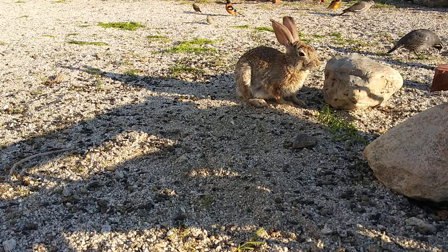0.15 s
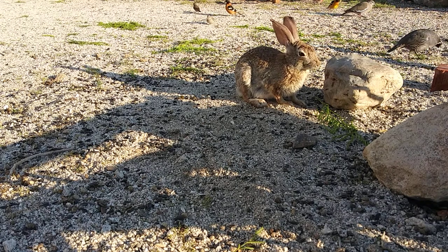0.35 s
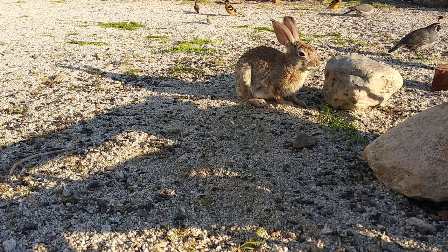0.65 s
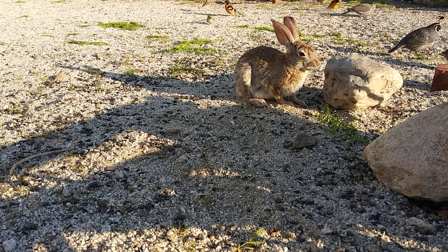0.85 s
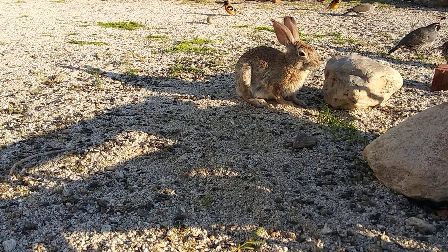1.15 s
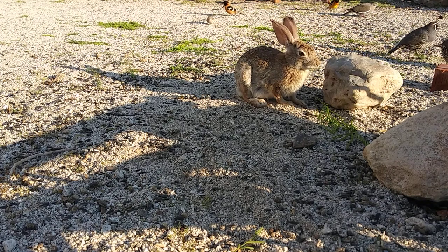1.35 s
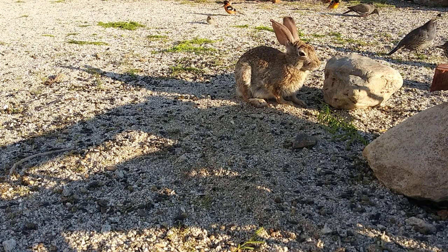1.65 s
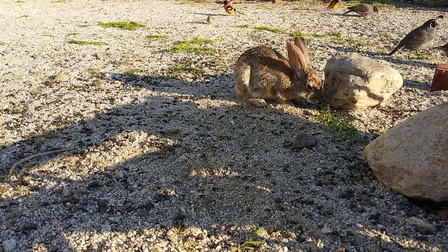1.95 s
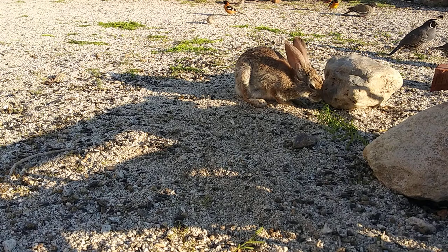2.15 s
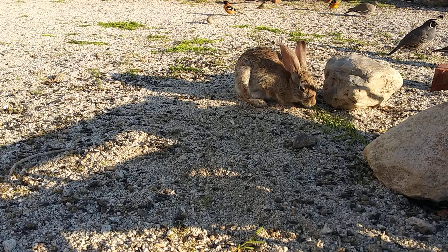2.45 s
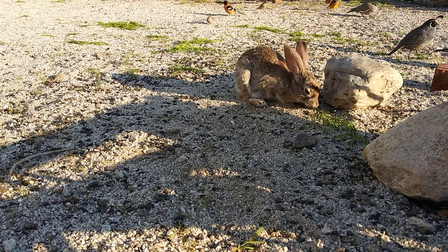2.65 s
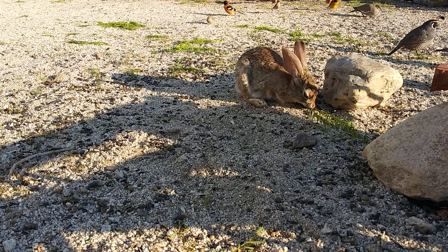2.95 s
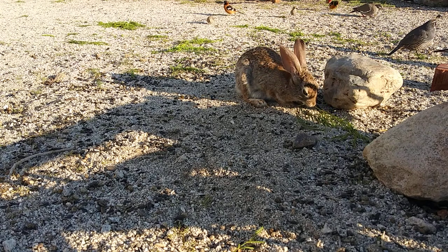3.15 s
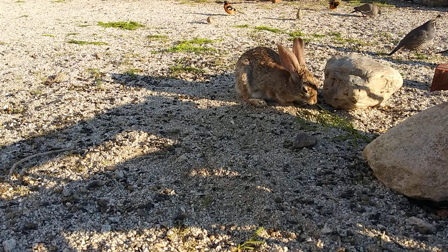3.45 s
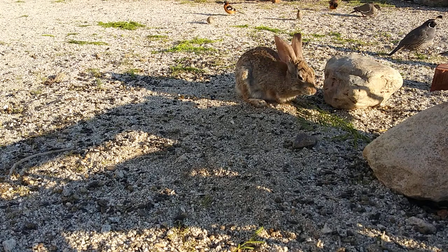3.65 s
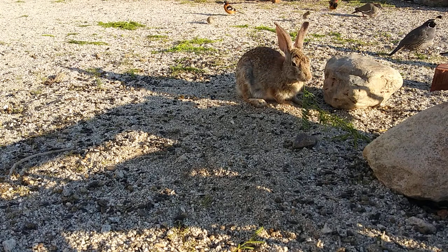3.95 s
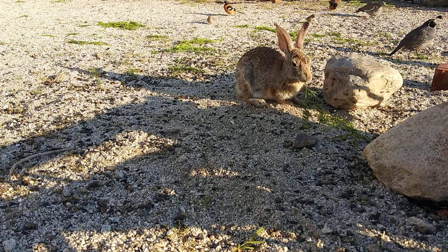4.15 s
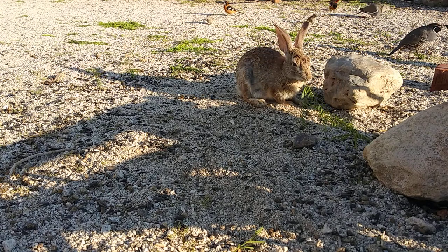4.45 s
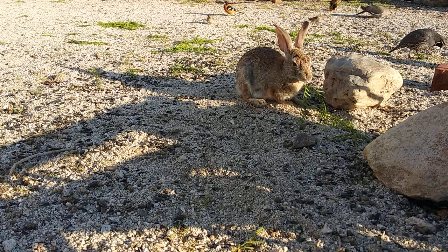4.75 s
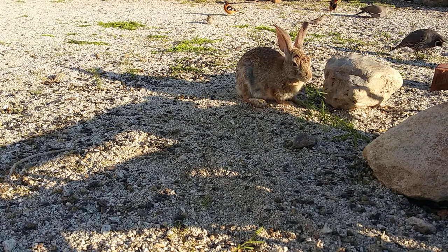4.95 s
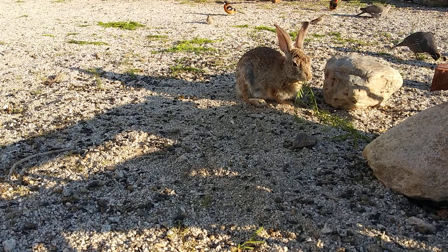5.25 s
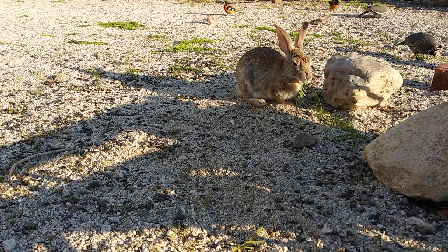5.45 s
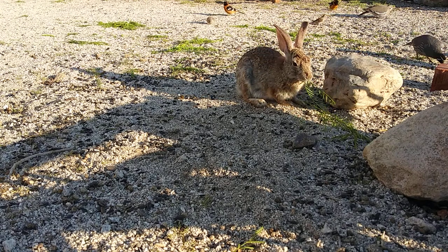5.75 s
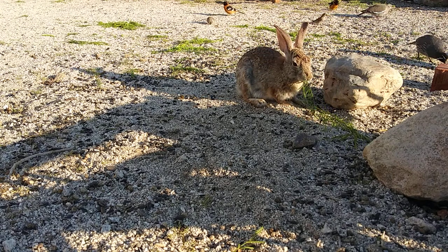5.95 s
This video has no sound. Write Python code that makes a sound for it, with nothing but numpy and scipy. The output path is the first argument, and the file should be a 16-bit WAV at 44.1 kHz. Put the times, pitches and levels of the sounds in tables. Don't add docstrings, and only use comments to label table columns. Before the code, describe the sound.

Outdoor gravel yard with a faint distant hum and hiss. At first a quail gives four raspy arched calls while wind puffs bump the microphone. Small birds chirp and flutter, seeds crack in beaks, one very loud near the middle. Later a clearer quail whistles two rounded calls, each doubled by a wall echo, among faint far quail, and a softer answer ends it.

```python
import sys
import numpy as np
from scipy import signal
from scipy.fft import rfft, irfft
from scipy.io import wavfile
from scipy.ndimage import uniform_filter1d, map_coordinates

SR = 44100
rng = np.random.default_rng(int(sys.argv[2]) if len(sys.argv) > 2 else 0)


def unload_audio(sound):
    columns = np.transpose(np.atleast_2d(sound))
    steps = np.round(np.clip(columns, -1, 1) * 32767)
    wavfile.write(sys.argv[1], SR, steps.astype(np.int16))


def nominal_scale(level):
    x = np.asarray(level, float) / 20
    return 10 ** x


N = 269002


def track(rows, order, smooth_s=0.0092):
    s, *columns = np.transpose(rows)
    place = np.interp(np.arange(s[0], s[-1], 1 / SR), s, np.arange(len(s)))
    curves = []
    for column in columns:
        curve = map_coordinates(column, [place], order=order, mode="nearest")
        curves.append(uniform_filter1d(curve, int(smooth_s * SR) + 1))
    return s[0], curves


def read(points, hz):
    f, value = np.transpose(points)
    return np.interp(np.log(hz + 1), np.log(f + 1), value)


def evened(x):
    return x / np.sqrt(np.mean(x ** 2) + 1e-20)


def add(mix, s, sound):
    part = mix[round(s * SR):][:len(sound)]
    part += sound[:len(part)]


def resonate(x, hz, width):
    return signal.lfilter(*signal.iirpeak(min(hz, SR / 2.2), hz / width, SR), x)


def resonate_twice(x, hz, width):
    return resonate(resonate(x, hz, width), hz, width)


def coloured(points):
    gain = nominal_scale(read(points, np.fft.rfftfreq(N, 1 / SR)))
    return evened(irfft(rfft(rng.standard_normal(N)) * gain, N))


def voice(hz, level_db, rough, throat, breath_db=-34, steady=True, count=14):
    waver = evened(uniform_filter1d(rng.standard_normal(len(hz)), 60))
    turns = np.cumsum(hz) / SR + 0.14 * np.clip(rough, 0, 1) * waver
    k = np.arange(1, count + 1)[:, None]
    softer_db = 0.34 * (level_db - np.max(level_db)) * (k * hz > 4000)
    gains = nominal_scale(read(throat, k * hz) + softer_db) * (k * hz < SR / 2.5)
    loudness = np.sqrt((gains ** 2).sum(0) / 2) if steady else 1
    tone = (gains * np.cos(2 * np.pi * k * turns + k * k)).sum(0) / loudness
    air = rng.standard_normal(len(hz))
    breath = nominal_scale(breath_db) * (0.23 * air + 2 * resonate(air, 8450, 2500))
    fade = signal.windows.tukey(len(hz), min(0.0068 * SR / len(hz), 1))
    return nominal_scale(level_db) * (tone + breath) * fade


# pitch_hz [Hz], level_db [dB]
WASH_COLOUR = [(76, -41), (130, -6.5), (225, -3), (450, -6), (900, -13), (2050, -17), (4500, -19),
               (6400, -25), (7500, -19.5), (8600, -12.5), (10000, -20.5), (15500, -17.5), (16000, -50)]


def yard():
    swell, waver = (evened(uniform_filter1d(uniform_filter1d(rng.standard_normal(N), 4000), 4000))
                    for _ in range(2))
    hum_hz = 119 + 3 * waver
    hum = nominal_scale(1.6 * swell[::-1]) * np.cos(2 * np.pi * np.cumsum(hum_hz) / SR)
    wash = nominal_scale(-67 + 0.36 * swell) * coloured(WASH_COLOUR)
    return wash + nominal_scale(-74.5) * hum


# start_s [s], peak_db [dB], pitch_hz [Hz]
WIND_PUFFS = [(0.029, -66.5, 68), (0.059, -57, 148), (0.111, -60, 72), (0.189, -59, 115), (0.27, -41, 124),
              (0.308, -38.5, 105), (0.453, -48.5, 81.4), (0.478, -59, 64.6), (0.519, -70, 65),
              (0.71, -56, 113), (0.799, -57, 112), (0.862, -41.5, 93), (0.96, -55, 85)]
# start_s [s], level_db [dB]
WIND_STRENGTH = [(0.0, -59.5), (0.2, -81), (0.3, -65), (0.42, -74), (0.49, -62), (0.61, -81), (0.7, -63),
                 (0.76, -79), (0.88, -66), (1.09, -85), (1.15, -76), (1.44, -78), (1.51, -84), (1.65, -73),
                 (1.73, -88), (2.43, -94), (3.06, -84.5), (3.43, -90), (3.52, -80), (3.82, -91),
                 (5.98, -84), (6.1, -82)]


def wind():
    t = np.arange(N) / SR
    strength_db = np.interp(t, *np.transpose(WIND_STRENGTH))
    out = nominal_scale(strength_db) * coloured([(20, -61), (45, -2), (70, 7), (100, 5), (160, -18), (300, -47)])
    for s, db, hz in WIND_PUFFS:
        cycle = np.arange(2000) / SR * hz - 1
        add(out, s, nominal_scale(db) * np.exp(-(cycle / 0.5) ** 2) * np.cos(2 * np.pi * cycle))
    return out


# start_s [s], pitch_hz [Hz], level_db [dB]
FAR_QUAIL_CALLS = [
    [(1.95, 606, -81), (1.97, 532, -66), (1.998, 418, -74), (2.01, 390.5, -101)],
    [(3.5, 547, -66.5), (3.564, 683, -72), (3.592, 714, -68), (3.628, 730, -64), (3.67, 810, -80)],
    [(4.27, 538, -88), (4.288, 662, -70), (4.306, 736, -66.5), (4.34, 527.9, -78)],
    [(4.4, 461.2, -76), (4.48, 606, -78.5), (4.544, 747, -68.5), (4.598, 857.3, -70), (4.682, 984, -68.5),
     (4.712, 997, -64), (4.774, 913.3, -69.5), (4.82, 731.9, -79)],
    [(4.96, 488, -71), (4.984, 767, -69), (5.0, 934, -67), (5.062, 652, -66), (5.08, 596.6, -81)],
    [(5.22, 391, -80), (5.24, 436, -74), (5.248, 405, -57), (5.26, 380, -69)],
    [(5.41, 654, -77), (5.444, 955, -61.5), (5.47, 889, -54), (5.5, 463, -67)],
    [(5.53, 428, -73), (5.62, 636, -61.5), (5.676, 983, -62.5), (5.718, 1054, -63.5), (5.786, 1068, -68.5),
     (5.8, 1074, -93)],
    [(5.855, 506, -91), (5.863, 474, -51.5), (5.871, 452, -63), (5.89, 416, -58)],
    [(5.98, 515, -68), (6.004, 810, -70), (6.02, 1045, -61), (6.032, 979.5, -74), (6.1, 625, -62)],
]
# pitch_hz [Hz], level_db [dB]
FAR_QUAIL_THROAT = [(400, 10.5), (1000, -8), (1700, -18), (2000, -10.5), (2300, -19), (2900, -17),
                    (3400, -21), (5000, -42)]


def far_quail():
    out = np.zeros(N)
    for rows in FAR_QUAIL_CALLS:
        s, (hz, level_db) = track(rows, order=1, smooth_s=.005)
        add(out, s, voice(hz, level_db, .04, FAR_QUAIL_THROAT))
    return out


# start_s [s], pitch_hz [Hz], level_db [dB]
BIRD_CHIRP = [(1.545, 3726, -69), (1.57, 4214, -54.5), (1.582, 3880, -54.5), (1.59, 3120, -64),
              (1.6, 2900, -54.5), (1.607, 3036, -62), (1.617, 3790, -63), (1.635, 3350, -57.5),
              (1.655, 3300, -81)]
# start_s [s], pitch_hz [Hz], level_db [dB]
BIRD_WHISTLES = [
    [(2.05, 2832, -87), (2.086, 3470, -86), (2.1, 3538, -82), (2.126, 3429, -78), (2.184, 3052, -81),
     (2.216, 2918, -81), (2.316, 2780, -85), (2.38, 2790, -86), (2.45, 3052, -89)],
    [(2.5, 3370, -72), (2.53, 3580, -65), (2.554, 1826, -69), (2.58, 2790, -69.5), (2.6, 2660, -85)],
]
# start_s [s], pitch_hz [Hz], level_db [dB]
PURE_WHISTLES = [
    [(1.9, 8100, -89), (2.05, 8250, -84), (2.1, 8800, -83), (2.25, 8500, -89), (2.35, 8600, -81),
     (2.5, 8800, -88)],
    [(5.89, 4150, -76), (5.93, 4160, -68), (6, 4060, -80), (6.05, 4120, -70.5), (6.1, 4130, -65)],
    [(5.56, 3900, -71), (5.6, 4200, -71), (5.65, 3950, -69), (5.72, 3800, -70)],
    [(5.67, 5050, -78), (5.72, 5250, -75), (5.8, 5350, -73)],
]
# pitch_hz [Hz], level_db [dB]
CHIRP_BILL = [(3000, 0), (4000, -2.5), (8000, -0.5), (10500, 2.5), (12000, -8), (14000, -30)]
WHISTLE_BILL = [(2000, 0), (4500, -15), (6000, -57), (16000, -72)]
# start_s [s], pitch_hz [Hz], level_db [dB], length_s [s]
BIRD_PEEPS = [(2.55, 3780, -72, .02), (3.1, 2850, -78.5, .04), (3.333, 2910, -76, 0.032),
              (4.094, 2920, -71.5, 0.029), (4.565, 3000, -69.5, 0.023), (4.564, 4280, -74, 0.049),
              (4.556, 6000, -66.5, 0.042), (5.583, 4500, -59, .03), (5.969, 1970, -65.5, 0.148),
              (1.573, 4200, -59, 0.024), (1.629, 4150, -65, .02), (1.63, 7600, -72, .02),
              (1.643, 3280, -68, .015), (6.02, 6030, -69, 0.026), (3.8, 2020, -74.5, .1)]


def small_birds():
    out = np.zeros(N)
    for calls, throat, rough, count in ((BIRD_WHISTLES, WHISTLE_BILL, .04, 14),
                                        (PURE_WHISTLES, [(4000, 0)], .5, 1),
                                        ([BIRD_CHIRP], CHIRP_BILL, .6, 14)):
        for rows in calls:
            s, (hz, level_db) = track(rows, order=1, smooth_s=.005)
            add(out, s, voice(hz, level_db, rough, throat, count=count))
    for s, hz, db, length in BIRD_PEEPS:
        swell = np.hanning(int(length * SR))
        add(out, s, swell * voice(hz * (.97 + 0.0345 * swell), db, 0.39, WHISTLE_BILL, count=1))
    return out


# start_s [s], pitch_hz [Hz], width_hz [Hz], level_db [dB], length_s [s]
WING_FLUTTERS = [
    (0.43, 4070, 900, -66, 0.045),
    (0.653, 4570, 1200, -61.5, .035),
    (0.863, 5160, 905, -68, 0.072),
    (0.952, 5200, 900, -64.5, 0.022),
    (3.333, 5700, 830, -70, 0.046),
    (4.702, 8500, 3000, -60, 0.074),
    (5.861, 8200, 1200, -57, .025),
    (5.914, 4800, 900, -61, .04),
    (5.923, 8200, 1200, -61, 0.044),
]


def flutters():
    out = np.zeros(N)
    for s, hz, width, db, length in WING_FLUTTERS:
        count = int(length * SR)
        grit = rng.standard_normal(4000)[:count]
        add(out, s, nominal_scale(db) * np.hanning(count) * evened(resonate_twice(grit, hz, width)))
    return out


# start_s [s], peak_db [dB], ring_hz [Hz], thud_db [dB], click_db [dB], sizzle_db [dB]
SEED_CRACKS = [(0.0707, -47, 8800, -19, -29, -20), (0.5227, -29, 9130, -18, -32, -23),
               (0.9045, -52, 9460, -16, -14, -21), (0.9502, -47.5, 8620, -9, -6, -13),
               (0.9892, -42, 8700, -13, -22, -21), (1.1228, -54, 8900, -23, -21, -19),
               (1.1418, -55, 8600, -4, -4, -22), (2.6484, -56, 9730, -14, -19, -21),
               (2.7452, -46.5, 8200, -23, -26, -26), (2.808, -42, 9200, -33, -38, -23),
               (2.9243, -29.5, 8000, -30, -28, -21), (3.017, -15, 9500, -32.5, -43, -10),
               (3.1223, -46.5, 8950, -15, -24, -20), (3.3104, -42.5, 8300, -23, -25, -19),
               (3.4351, -53.5, 9090, -17, -24, -21), (3.6721, -40, 9300, -5, -21, -29),
               (4.0367, -50, 10000, -24, -23, -24), (4.1185, -48, 9100, -18, -25, -10),
               (4.143, -31, 9800, -27, -41, -27), (4.1844, -41, 8800, -23, -25, -29),
               (4.3326, -50, 9010, -21, -24, -20), (4.4338, -51, 9200, -18, -23, -21),
               (4.4687, -54, 9080, -19, -24, -20), (4.5735, -48.5, 8050, -22, -11, -20),
               (4.6738, -37.5, 9000, -16, -33, -29), (4.7132, -35, 9020, -14, -30, -18),
               (4.7336, -34, 8800, -19, -36, -22), (5.033, -29.5, 8900, -28, -36, -21),
               (5.2674, -23.5, 9800, -29, -44, -27), (5.444, -48.5, 8300, 5.5, -17, -19),
               (5.8691, -43.5, 8940, -4, -24, -25)]


def cracks():
    out, t = np.zeros(N), np.arange(3000) / SR
    for s, db, ring_hz, *parts_db in SEED_CRACKS:
        grit = rng.standard_normal((2, 3000))
        snap = (t == 0) + 0.16 * grit[0] * np.exp(-t / 0.0014)
        ring = resonate_twice(resonate(snap, ring_hz, 2540), ring_hz, 4400)
        crack = ring / abs(ring).max()
        for part_db, hz, width in zip(parts_db, (1300, 5600, 13500), (2300, 3400, 2500)):
            part = resonate_twice(snap, hz, width)
            crack = crack + nominal_scale(part_db) * part / abs(part).max()
        scatter = nominal_scale(-13) * grit[1] * np.exp(-t / 0.02) * (abs(grit[0]) > 1.75)
        scatter[[530, 568, 650]] += .6, 1, .55
        returns = signal.fftconvolve(crack, scatter)[:3000]
        add(out, s, nominal_scale(db) * (crack + nominal_scale(-19.5) * returns))
    return out


# start_s [s], pitch_hz [Hz], effort_db [dB], rasp_db [dB]
ROUGH_QUAIL_CALLS = [
    [(0.0, 1082, -43, -55.5), (0.024, 1029, -46, -63), (0.05, 544, -58, -80), (0.114, 581.3, -60.5, -88),
     (0.184, 959.4, -44, -54.5), (0.24, 1239, -53.5, -77), (0.306, 1228, -52, -70), (0.34, 1005, -48, -79),
     (0.38, 593.5, -65, -85)],
    [(0.51, 593, -58, -94), (0.524, 835, -45, -61), (0.544, 1195, -54, -77), (0.58, 963, -50.5, -62),
     (0.632, 871, -46.5, -65), (0.764, 565.6, -61.5, -88), (0.78, 650, -66.5, -91)],
    [(1.16, 667, -49.5, -79), (1.194, 1102, -45, -56), (1.234, 554.4, -57, -84), (1.26, 521.6, -68, -89),
     (1.312, 636.4, -53, -62), (1.42, 1201, -46, -73.5), (1.476, 1215, -59.5, -73.5),
     (1.52, 1040, -49, -71), (1.57, 595, -61.5, -81)],
    [(1.695, 602, -52.5, -89), (1.707, 822, -46.5, -68), (1.725, 1179, -54, -75), (1.787, 792, -51.5, -61),
     (1.869, 664.9, -55.5, -79), (1.897, 566, -66, -99), (1.915, 552, -64, -98)],
]
# pitch_hz [Hz], level_db [dB]
ROUGH_QUAIL_THROAT = [(500, -12), (1000, -9.5), (1300, -9), (1550, -1.5), (1900, 2.5), (2080, -11.5),
                      (2250, -15), (3000, -22.5), (4400, -46.5), (5700, -14), (6800, -38), (8200, -15),
                      (9500, -35)]
# pitch_hz [Hz], width_hz [Hz], level_db [dB]
RASP_HOLLOWS = [
    (1930, 410, 1.5),
    (5790, 420, 10.5),
    (8200, 1000, 7.5),
]


def rough_quail():
    out = np.zeros(N)
    for rows in ROUGH_QUAIL_CALLS:
        s, (hz, effort_db, rasp_db) = track(rows, order=1, smooth_s=0.0175)
        strain = np.clip((hz - 980) / 200, 0, 1)
        opening = 1 + 0.96 * np.cos(2 * np.pi * np.cumsum(hz) / SR)
        puffs = rng.standard_normal(len(hz)) * opening
        rasp = sum(nominal_scale(db) * evened(resonate_twice(puffs, f, w)) for f, w, db in RASP_HOLLOWS)
        rough = 0.067 + 0.53 * strain
        tone = voice(hz, effort_db, rough, ROUGH_QUAIL_THROAT, breath_db=-40, steady=False)
        call = tone + nominal_scale(rasp_db - 3) * strain ** .5 * rasp
        for delay_s, db in ((0, 0), (.0074, -12.5), (.0105, -14)):
            add(out, s + delay_s, nominal_scale(db) * call)
    return out


# start_s [s], pitch_hz [Hz], level_db [dB]
WALL_QUAIL_CALLS = [
    [(3.47, 610, -60.5), (3.509, 818.0, -51), (3.548, 982, -40), (3.586, 1015, -40.5), (3.625, 1028, -37),
     (3.664, 1012.3, -39), (3.702, 963, -41), (3.741, 800, -55), (3.78, 679, -63.5), (3.795, 595, -72)],
    [(5.41, 539, -65.5), (5.453, 802, -50.5), (5.495, 980.4, -40), (5.537, 1025, -38.5),
     (5.58, 1042, -37.5), (5.623, 1029, -37.5), (5.665, 1002, -41), (5.707, 855, -52), (5.75, 713, -64.5),
     (5.768, 630, -69)],
]
# delay_s [s], level_db [dB]
ECHOES = [
    (.0186, -1.3),
    (.01857, -1.8),
]
# start_s [s], pitch_hz [Hz], level_db [dB]
ANSWER_CALL = [(5.81, 690, -64), (5.834, 842.0, -64), (5.86, 969.9, -53.5), (5.91, 987, -50),
               (5.96, 963, -55.5), (6.058, 754, -72), (6.08, 676, -84)]
# pitch_hz [Hz], level_db [dB]
WALL_QUAIL_THROAT = [(500, -9), (1000, -23), (1500, -12), (2060, -2.5), (2300, -11.5), (2820, -37.5),
                     (4200, -45), (5100, -30.5), (6100, -33), (7300, -36), (8400, -39), (9500, -71)]
ANSWER_CALL_THROAT = [(700, -19), (1000, -16.5), (1500, -12.5), (2000, 1.5), (2300, -8), (3000, -23.5),
                      (4000, -33), (5000, -23), (6000, -25), (7000, -36)]


def wall_quail():
    out = np.zeros(N)
    for rows, (delay_s, db) in zip(WALL_QUAIL_CALLS, ECHOES):
        s, (hz, level_db) = track(rows, order=3)
        call = voice(hz, level_db, 0.011, WALL_QUAIL_THROAT, breath_db=-26.5)
        add(out, s, call)
        add(out, s + delay_s, nominal_scale(db) * call)
    s, (hz, level_db) = track(ANSWER_CALL, order=3)
    answer = voice(hz, level_db, .03, ANSWER_CALL_THROAT, breath_db=-30)
    add(out, s, answer)
    add(out, s + .0125, nominal_scale(-12) * answer)
    return out


def tail(x):
    t = np.arange(9000) / SR
    sparse = rng.standard_normal(9000) * (rng.random(9000) < .03)
    taps = sparse * nominal_scale(-60 * t / 0.39) * (t > .004)
    return signal.fftconvolve(x, taps / np.linalg.norm(taps))[:N]


def scene():
    background = yard() + wind()
    others = far_quail() + small_birds() + flutters() + rough_quail()
    near = wall_quail()
    scattered = tail(nominal_scale(-27) * near + nominal_scale(-16) * others)
    return (background + others + cracks() + near + scattered)[None]


def band_limit(x):
    return signal.sosfilt(signal.butter(12, 16970, fs=SR, output="sos"), x)


def record(dry):
    edges_hz = 30, 16400
    band = signal.butter(4, edges_hz, "bandpass", fs=SR, output="sos")
    return band_limit(signal.sosfilt(band, dry))


dry = scene()
out = record(dry)
unload_audio(out)
```